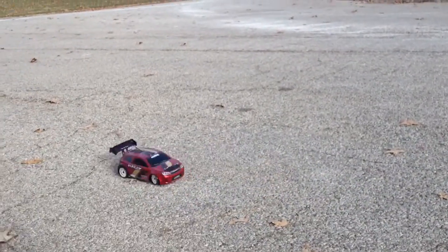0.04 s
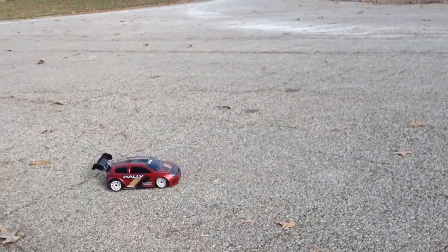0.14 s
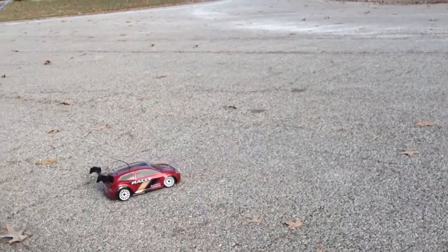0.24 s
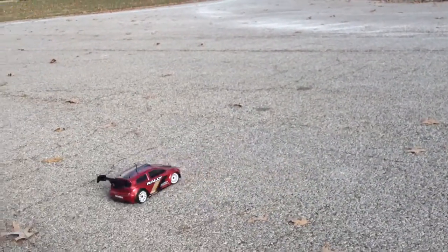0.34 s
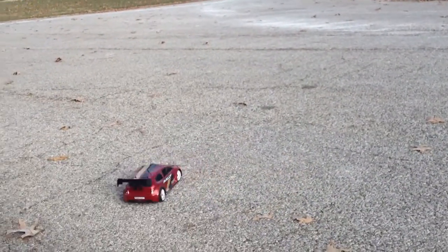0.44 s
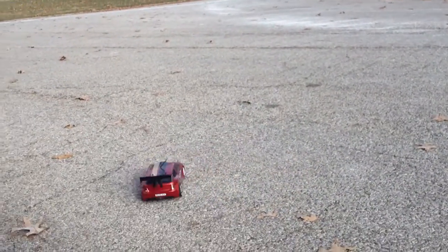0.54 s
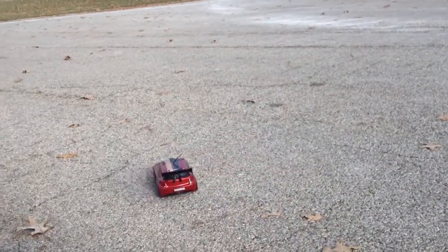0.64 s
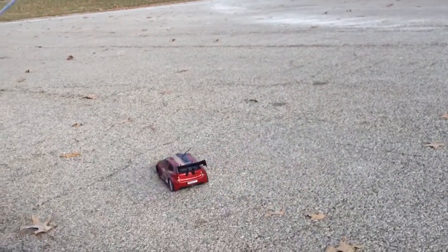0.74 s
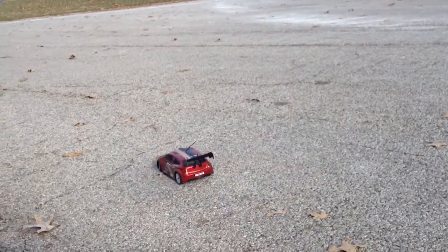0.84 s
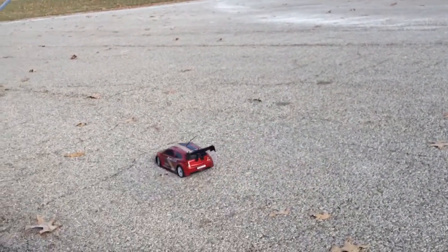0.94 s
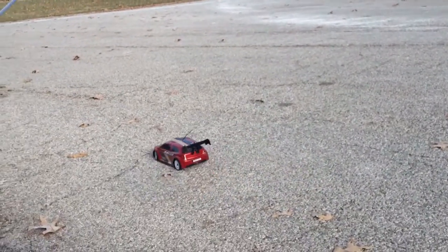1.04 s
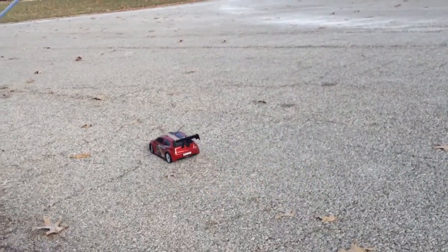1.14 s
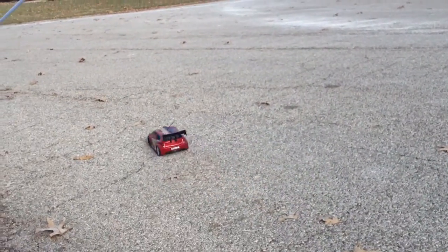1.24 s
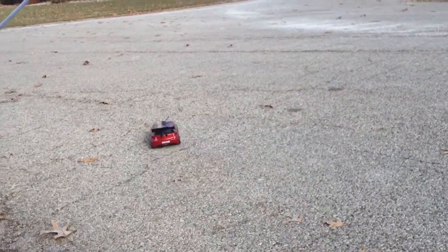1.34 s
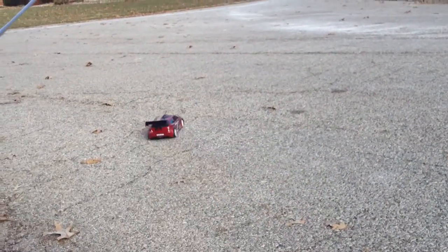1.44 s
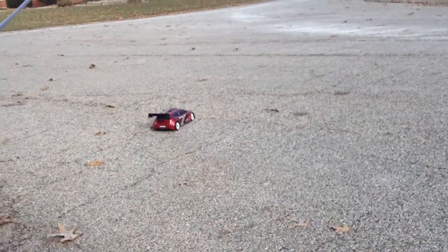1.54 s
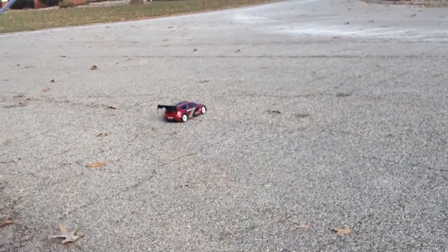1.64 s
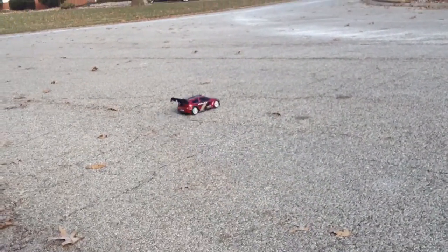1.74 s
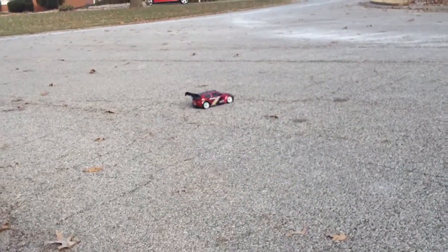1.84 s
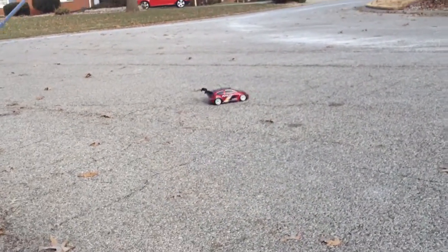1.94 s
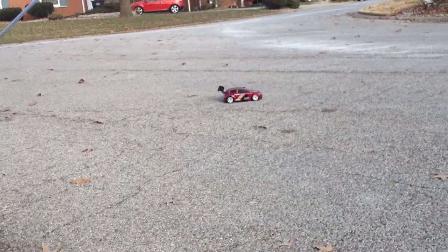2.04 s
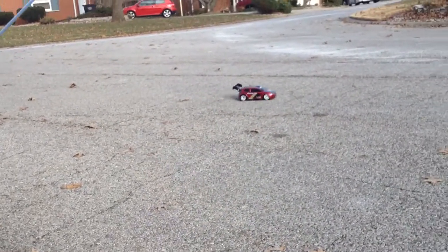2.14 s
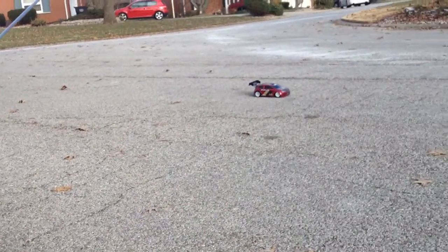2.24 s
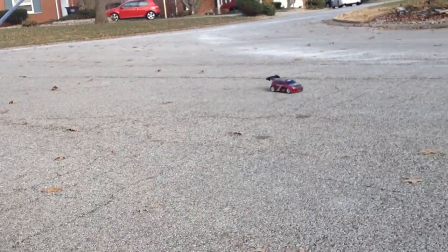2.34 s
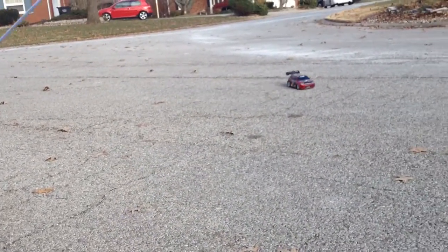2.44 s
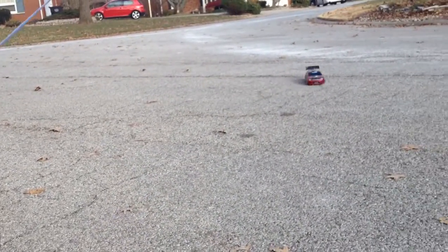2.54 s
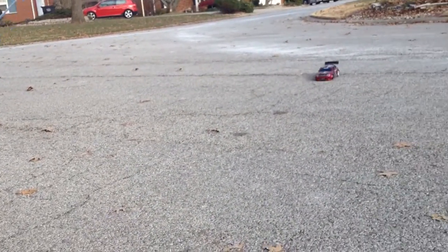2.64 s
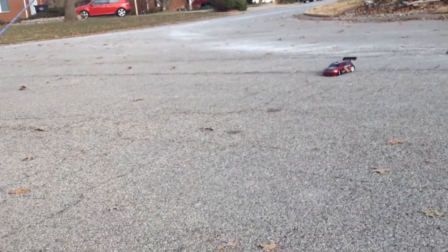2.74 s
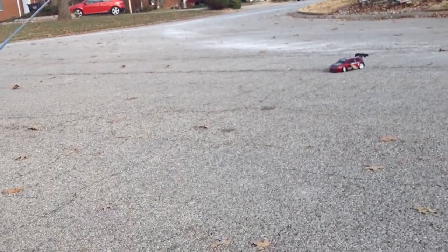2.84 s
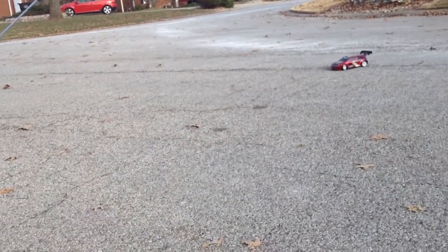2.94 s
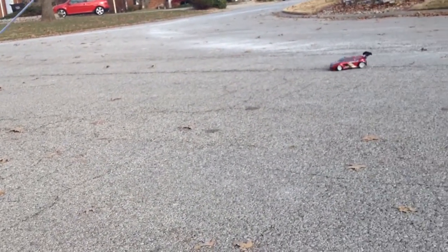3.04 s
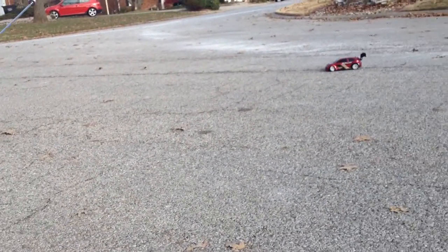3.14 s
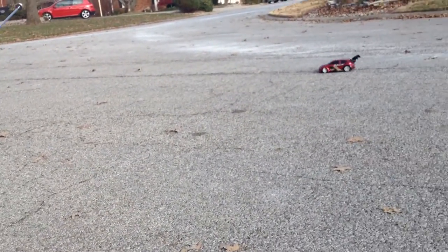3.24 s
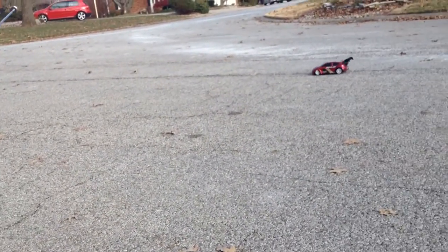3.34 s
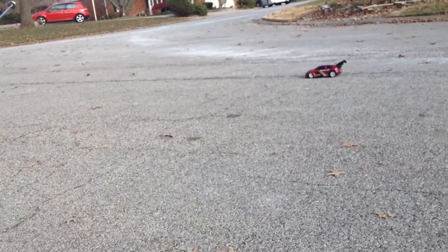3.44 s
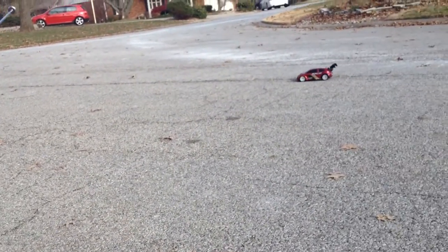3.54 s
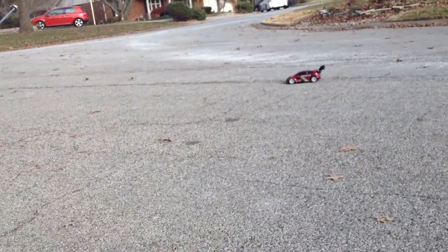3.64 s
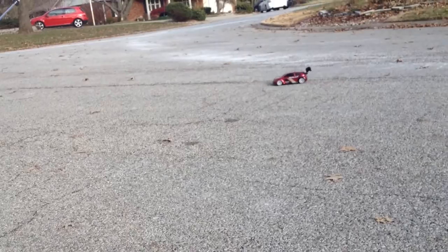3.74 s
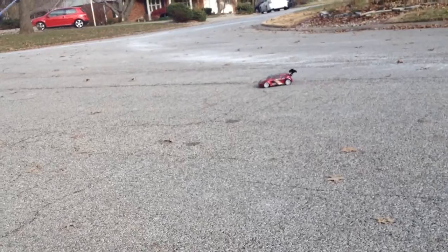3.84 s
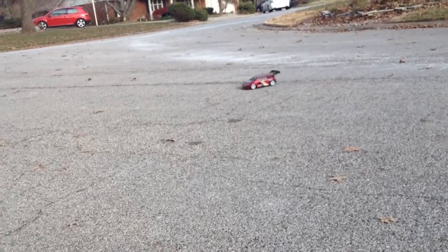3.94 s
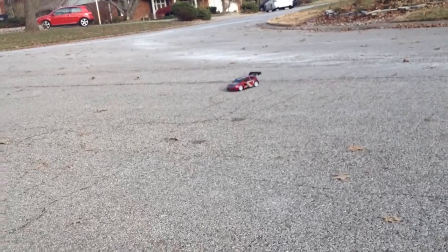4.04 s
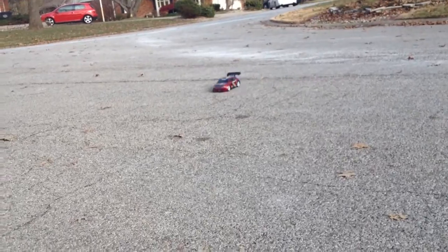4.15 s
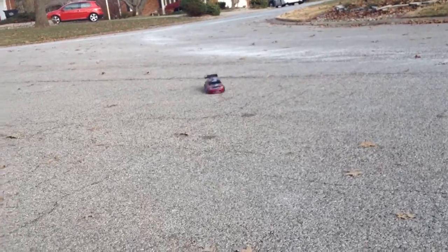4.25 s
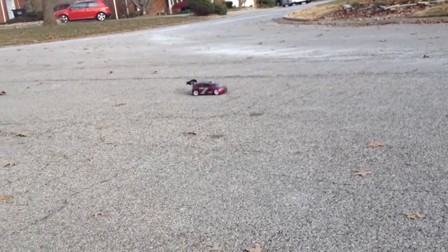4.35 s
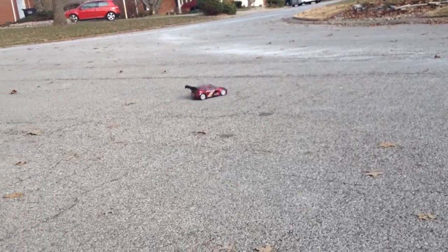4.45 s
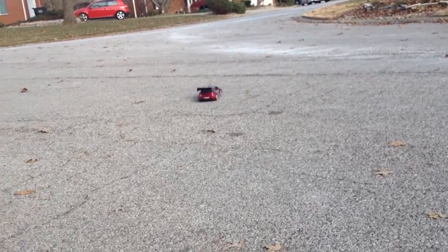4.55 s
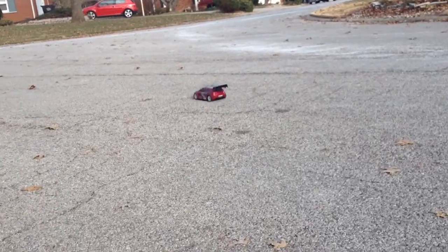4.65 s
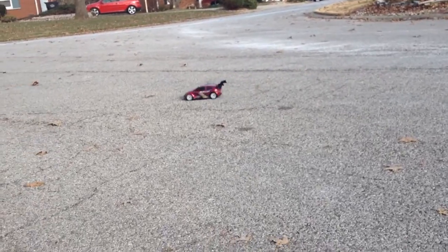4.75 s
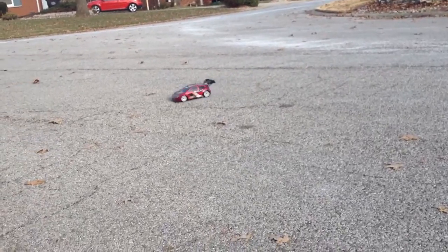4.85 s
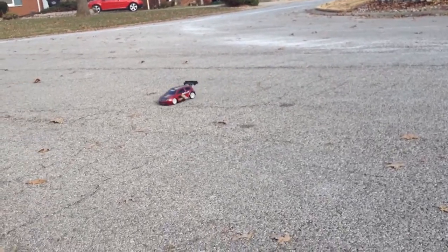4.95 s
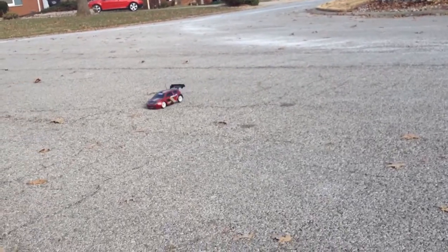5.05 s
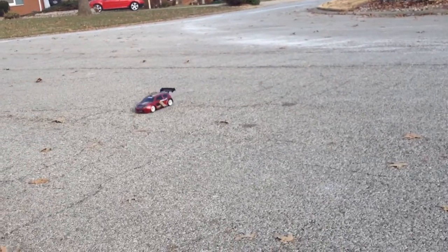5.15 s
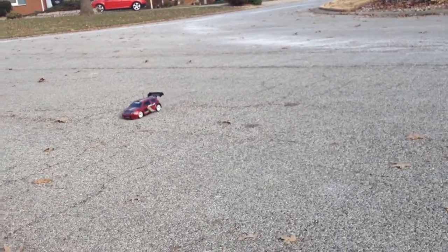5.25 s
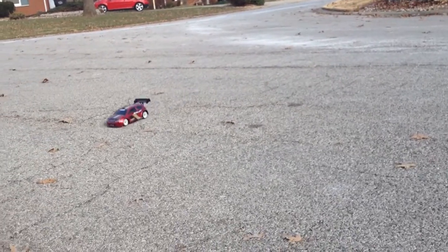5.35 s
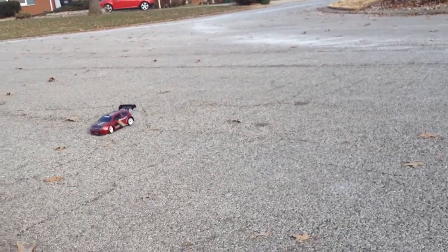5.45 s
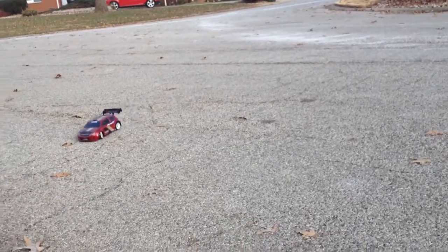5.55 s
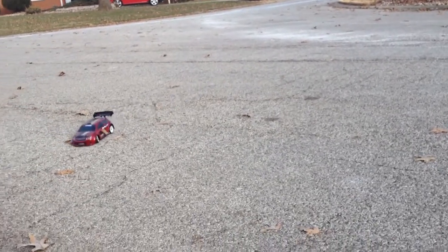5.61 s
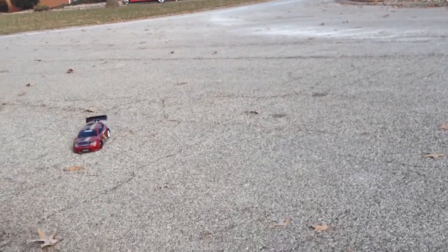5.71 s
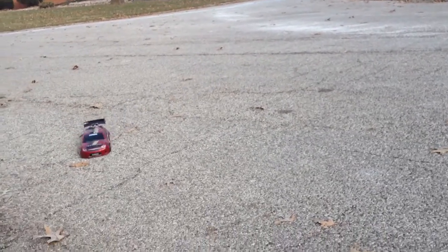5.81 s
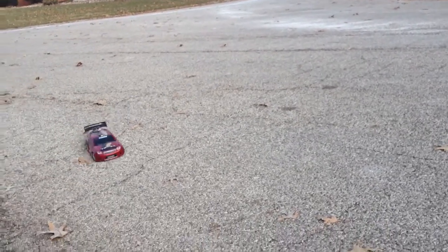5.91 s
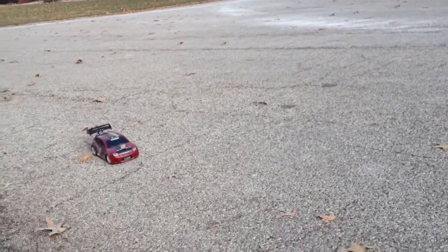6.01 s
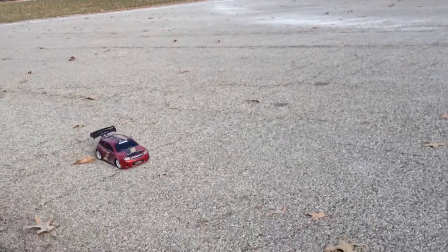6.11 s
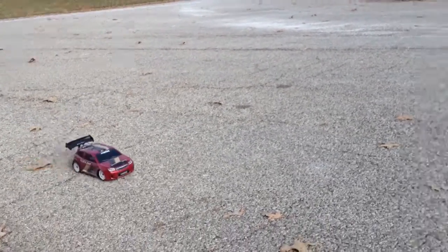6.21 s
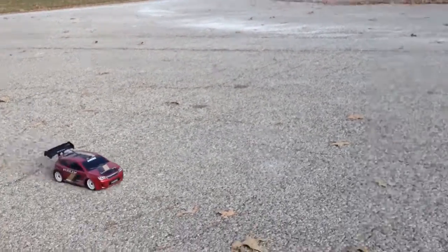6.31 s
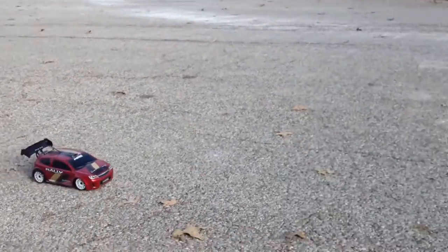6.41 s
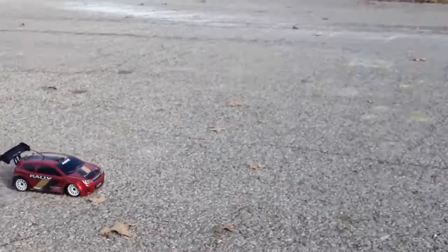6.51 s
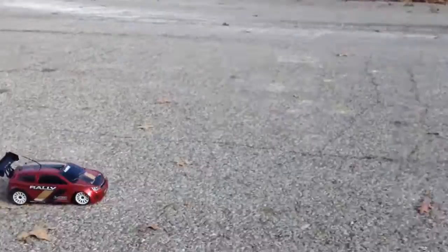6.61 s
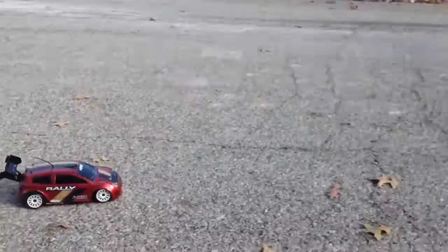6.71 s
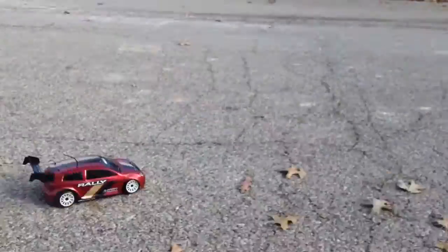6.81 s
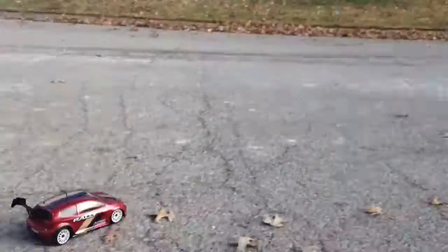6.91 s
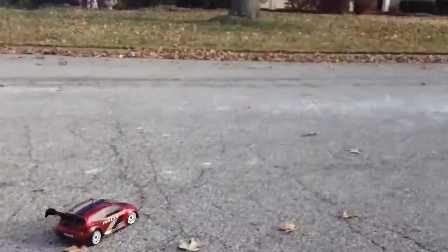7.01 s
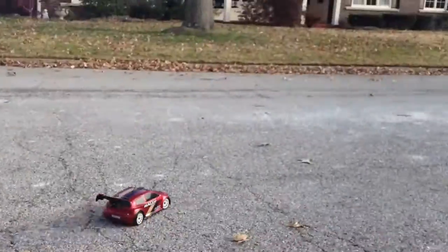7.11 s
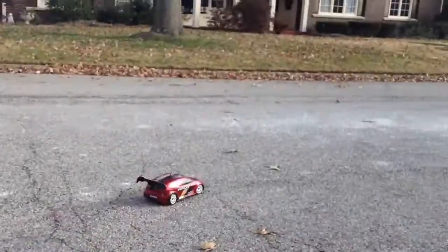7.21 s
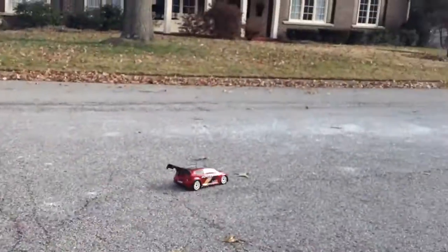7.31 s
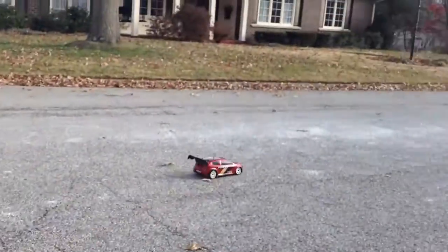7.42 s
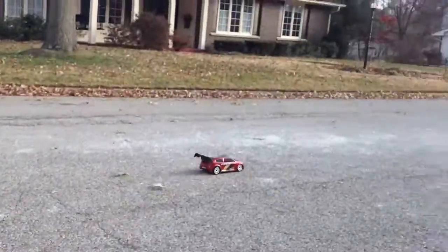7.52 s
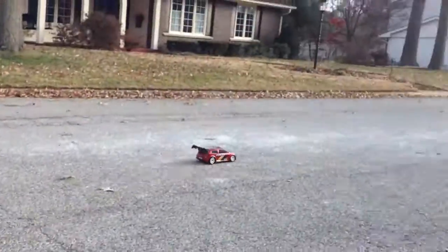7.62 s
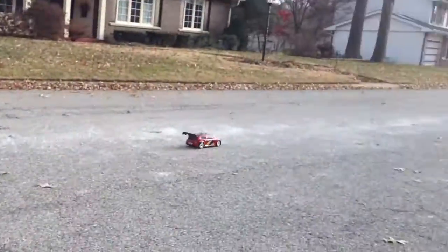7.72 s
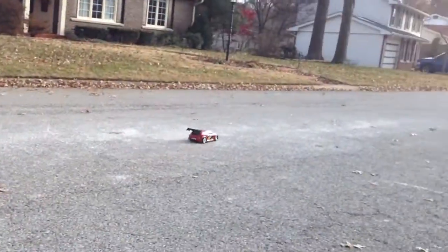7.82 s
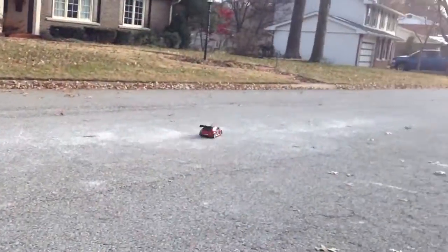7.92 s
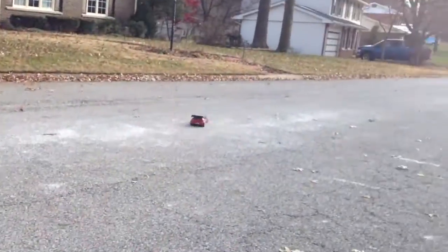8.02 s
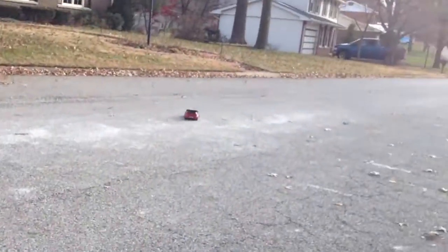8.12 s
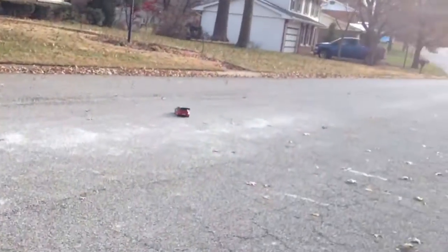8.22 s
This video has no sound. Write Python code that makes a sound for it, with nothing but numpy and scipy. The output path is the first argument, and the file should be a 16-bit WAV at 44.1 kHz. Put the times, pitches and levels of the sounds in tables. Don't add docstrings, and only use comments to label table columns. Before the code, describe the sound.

Raspy gear whine and plastic rattle of a remote-control car drifting on a road, with hissing grit, bright ticks and hollow knocks.

```python
import sys
import numpy as np
from scipy import signal
from scipy.fft import rfft, irfft
from scipy.io import wavfile
from scipy.ndimage import uniform_filter1d, map_coordinates

SR = 44100
rng = np.random.default_rng(int(sys.argv[2]) if len(sys.argv) > 2 else 0)


def generate_wav(sig):
    pcm = np.round(np.clip(np.atleast_2d(sig).T, -1, 1) * 32767).astype(np.int16)
    wavfile.write(sys.argv[1], SR, pcm)


def to_linear_factor(level_db):
    exponent = np.asarray(level_db, float) / 20
    return 10 ** exponent


N = 364704


def level(x, db):
    return x * to_linear_factor(db) / np.sqrt(np.mean(x ** 2))


def columns(table):
    s, *rest = np.transpose(table)
    return [np.interp(np.arange(N) / SR, s, column) for column in rest]


def band(x, hz, width):
    return signal.lfilter(*signal.iirpeak(hz, hz / width, fs=SR), x)


def walk(rate):
    hold = int(SR / rate)
    steps = np.repeat(rng.standard_normal(N // hold + 1), hold)
    return 1.28 * uniform_filter1d(uniform_filter1d(steps, hold), hold)[:N]


def body(x, modes, patchy_db=0, flip=-1):
    out = np.zeros(N)
    for k, (hz, width, db) in enumerate(modes):
        facing = to_linear_factor(db + patchy_db * walk(5))
        out += flip ** k * facing * band(x, hz, width)
    return out


def colour(x, points):
    hz, db = np.transpose(points)
    grid = np.log(np.arange(N // 2 + 1) * SR / N + 1)
    return irfft(rfft(x) * to_linear_factor(np.interp(grid, np.log(hz), db)), N)


def grains(spread_db, smear):
    height = np.minimum(rng.exponential(size=N), 5)
    hits = to_linear_factor(2 * spread_db * height) * (rng.random(N) < 0.05)
    power = signal.lfilter([1 - smear], [1, -smear], hits)
    return np.sqrt(power + 0.6 * power.mean()) * rng.standard_normal(N)


def ring(hz, decay_s, t):
    return np.sin(2 * np.pi * hz * t) * 1000.0 ** (-t / decay_s) * np.minimum(t / 0.0022, 1)


def add(out, s, sound):
    i = int(s * SR)
    out[i:i + len(sound)] += sound[:N - i]


# start in seconds, tooth rate aimed at in Hz, lag in seconds, level of the whine and of its
# lowest tone, both in dB above the rattle.
TRIGGER = [(0, 2000, 0.35, 5.5, -51), (.16, 2010, 0.3, -1, -3), (.3, 985, 0.55, 2, -1),
           (0.389, 994, 0.4, -9, -10), (.48, 978, 0.5, -2, -27), (.62, 992, 0.51, -6, -4),
           (1, 1000, 0.44, -3.5, -15), (1.42, 1487, 0.63, -6.5, -23), (1.58, 2400, 0.52, -9, -10),
           (1.74, 2401, 0.47, 0.5, -5), (1.95, 2396, 0.48, -5.5, -8), (2.35, 2390, 0.55, -3, -19),
           (2.83, 1870, .12, -0.5, -1.5), (3.15, 1984, 0.11, -9, 1), (3.38, 1404, 0.79, 1, 0.5),
           (3.6, 1399, 0.84, -8.5, -0.5), (3.921, 1945, 0.29, -4.5, 0.5), (4.129, 2004, .25, 0.5, -22),
           (4.28, 1606, 0.097, -1, -18), (4.34, 2610, 0.3, -5, -12), (4.53, 2400, 0.18, -9, -5.5),
           (4.66, 1003, 0.39, -3.5, -6), (4.86, 539, 0.079, -2, -3), (5, 540, 0.068, -10, -16),
           (5.06, 760.6, 0.63, -7, -23), (5.2, 1483, .5, -3, -22), (5.37, 1497, 0.51, -6, -18),
           (5.459, 560, 0.32, -5, -16), (6.06, 1492, 0.82, -9, -10), (6.17, 2380, 0.88, 1, -18),
           (6.27, 2400, .6, 0.5, -19), (6.39, 905.5, 0.063, -9, -18), (6.46, 2447, 0.39, -7, -18),
           (6.58, 2435, 0.38, -12, -3), (6.72, 2435, 0.4, -8.5, -5), (6.87, 2440, 0.38, -9.5, -12),
           (7.0, 2443, .41, -4, -11), (7.07, 2437, 0.43, -4.5, -8.5), (7.35, 2440, .41, -7, -13),
           (7.78, 3440, 1.27, -11, -6)]


def motor():
    t, hz, now = np.arange(N) / SR, np.zeros(N), TRIGGER[0][1]
    s, aim_hz, lag_s, whine_db, low_db = np.transpose(TRIGGER)
    for start, end, aim, lag in zip(s, [*s[1:], N / SR], aim_hz, np.abs(lag_s)):
        span = slice(int(start * SR), int(end * SR) + 1)
        hz[span] = aim + (now - aim) * np.exp((start - t[span]) / lag)
        now = aim + (now - aim) * np.exp((start - end) / lag)
    move = np.clip(np.searchsorted(s, t, side="right") - 1, 0, None)
    slew = int(0.04 * SR)
    curves = (hz, slew), (whine_db[move], 2 * slew), (low_db[move], 2 * slew)
    return [uniform_filter1d(curve, size, mode="nearest") for curve, size in curves]


# time in seconds, level in dB.
NEAR = [(0, -39), (1.45, -43), (2.2, -43.5), (2.4, -46), (3.5, -49), (4.25, -46), (4.56, -43), (4.9, -47),
        (5.04, -50.5), (5.25, -48.5), (5.46, -44.5), (5.55, -47.5), (5.9, -47), (6.36, -40), (6.43, -42),
        (6.77, -35.5), (7.3, -39.5), (8.27, -47.5)]


def nearness():
    return uniform_filter1d(columns(NEAR)[0], size=SR // 20)


# time in seconds, peak level in dB.
BITES = [(0.062, -28), (0.194, -33), (0.314, -37), (0.411, -27.5), (0.5052, -32), (0.7614, -29),
         (0.965, -29), (1.0457, -30), (1.0897, -32), (1.1548, -34), (1.2251, -43), (1.798, -36),
         (2.7995, -30), (2.824, -30), (2.9791, -38.5), (3.0073, -42), (3.0337, -40), (3.1313, -45.5),
         (3.1607, -36), (3.3094, -41), (3.3456, -40), (3.417, -40), (3.459, -42), (3.485, -40),
         (3.535, -37), (3.579, -37), (3.6232, -36), (3.6692, -35), (3.7, -36), (3.7287, -41),
         (3.7625, -37.5), (3.8289, -37), (4.0175, -40), (4.2981, -30), (4.3854, -31), (4.4858, -31),
         (4.5669, -29.5), (4.6005, -30.5), (4.9119, -35), (5.341, -38), (6.1968, -42), (6.2319, -38),
         (6.2984, -34), (6.3682, -32), (6.6173, -29), (6.6972, -27), (6.7244, -29), (6.774, -22),
         (6.807, -28), (6.8494, -27), (6.9314, -24), (6.9671, -26), (6.9972, -29), (7.0157, -24),
         (7.0476, -24), (7.1166, -28.5), (7.2902, -25.5), (7.3684, -27.5), (7.8375, -32), (7.957, -35)]


def spur_load(hz, near_db):
    spur_teeth = 58
    free = np.cumsum(hz / spur_teeth / SR)
    bite_s = np.array(BITES)[:, 0] + 0.003
    at = free[(bite_s * SR).astype(int)]
    whole = np.cumsum(np.maximum(np.round(np.diff(at, prepend=0)), 1)) + 0.5
    turn = np.interp(free, [0, *at, at[-1] + 50], [0, *whole, whole[-1] + 50])
    bite = (1 + 0.24 * rng.standard_normal(1000))[turn.astype(int)]
    load = -0.6 * bite * np.cos(2 * np.pi * turn) + 0.097 * walk(90)
    t = np.arange(1200) / SR
    bump = t / 0.0033 * np.exp(1 - t / 0.0033)
    for s, db in BITES:
        over_db = db - near_db[int(s * SR)] - 7
        add(load, max(s - 0.002, 0), 0.18 * max(over_db, 0) * bump)
    return np.minimum(load, 2.2)


CRUISE_HZ = 2000
# pitch in Hz, level in dB.
SINGS = [(1000, -17), (2300, -11), (3200, -6.5), (4200, -3.5), (5100, -7.5), (6500, -9.5), (8600, -12),
         (13000, -22)]
# time in seconds, level of the 2nd multiple in dB,
# level of the 6th and 8th multiples in dB, looseness of the teeth (backlash) from 0 to 1.
MESH = [(0, 11.5, -2, .3), (.14, 2, -2, 0.44), (.45, -4, 8, 1), (.53, 1, 2, 0.44), (.64, -1, 8, 1),
        (1.1, 2.5, 2, 0.65), (1.6, -1, 0, 0.52), (2.4, -2, -2, 1), (2.85, 2, 0, 0.85), (3.1, -6.5, 0, 0.96),
        (4.75, 0, -3.5, 0.95), (4.87, -7, -7, 0.82), (5.15, -1, 2, 0.56), (5.28, -1, 7, .5),
        (5.36, 4, -6, 0.7), (6.16, -8, 2, 0.53), (6.24, -9, -16, .5), (6.7, -0.5, 5, 0.92)]
MULTIPLE_DB = (-1.5, -15, -2, -4.5, -8)
POWER_DB = (1.8, 2, 4.2, 3.7, 1.1)


def gear_levels(hz, near_db, whine_db, low_db):
    second_db, high_db, backlash = columns(MESH)
    grid, carried_db = np.transpose(SINGS)
    power = uniform_filter1d(1.0 * (np.gradient(hz) > 0), size=SR // 20)
    half_db = near_db - 29 + 22 * np.log2(hz / CRUISE_HZ)
    levels_db = [half_db, near_db + low_db]
    mesh = (second_db, 0, 0, high_db, high_db)
    for k, db, gain_db, mesh_db in zip((2, 3, 4, 6, 8), MULTIPLE_DB, POWER_DB, mesh):
        shell_db = np.interp(np.log(k * hz), np.log(grid), carried_db)
        levels_db.append(near_db + whine_db + db + mesh_db + power * gain_db + shell_db)
    return levels_db, backlash


SMEAR_HZ = (70, 430, 330, 500, 520, 550, 650)
STEADY = (.5, .6, .36, .2, .3, .3, .3)
BITE_DB = (4.4, 7, 6, 6, 6.5, 5.5, 5.5)
PATCHY_DB = (1, 1, 1.5, 3, 2.5, 2.5, 3)
# pitch in Hz, width in Hz, level in dB.
SHELL = [(1940, 1090, -3.5), (2400, 700, -2), (3020, 320, -21), (3690, 750, -1.5), (4500, 150, 1.5),
         (5100, 290, -26)]
# pitch in Hz, width in Hz, level in dB below the rattle.
TRAY = (1705, 16, -19)


def whine(hz, levels_db, load, backlash):
    phase = 2 * np.pi * np.cumsum(hz * (1 + 0.0065 * walk(60))) / SR
    lines = []
    settings = zip((0.5, 1, 2, 3, 4, 6, 8), levels_db, SMEAR_HZ, STEADY, BITE_DB, PATCHY_DB)
    for k, db, smear, clean, bite_db, patchy_db in settings:
        steady = np.sin(k * phase)
        rough = walk(smear) * steady + walk(smear) * np.cos(k * phase)
        tone = clean * steady + np.clip(backlash, 0.2, 1) * rough
        throb = to_linear_factor(bite_db * load + 1.54 * walk(35) + patchy_db * walk(11))
        in_range = k * hz < 0.35 * SR
        lines.append(to_linear_factor(db) * level(throb * tone, 0) * in_range)
    half, first, upper = lines[0], lines[1], sum(lines[2:])
    cover = to_linear_factor(-4.5) * band(first, 1884, 200) + to_linear_factor(-7.5) * band(first, 2156, 190)
    first = to_linear_factor(-33) * first + cover + to_linear_factor(-10) * band(first, *TRAY[:2])
    through_shell = to_linear_factor(-6.5) * body(upper, SHELL, patchy_db=2.0, flip=0.99)
    past_shell = to_linear_factor(-3.5) * upper
    muffle = signal.butter(2, 15000, fs=SR, output="sos")
    return signal.sosfilt(muffle, half + first + through_shell + past_shell)


# pitch in Hz, density in dB per Hz.
GRIT = [(710, -19.5), (1200, -4), (1760, -6.5), (2890, -2), (4110, 2), (4930, -3), (9000, -6.5),
        (13500, -14), (15500, -11)]
# pitch in Hz, width in Hz, level in dB.
TUB = [(468, 250, -5), (599, 98, 4), (824, 108, -4.5), (1157, 172, -1)]
# middle in seconds, length in seconds, gain in dB.
COARSE = [
    (1.85, 0.17, 4.5),
    (4.759, .12, 1),
    (6.68, 0.19, 3.5),
    (7.306, 0.1, 0.5),
    (7.6, .35, 3.5),
]


def rolling(load, hz, near_db):
    speed, closer_db = np.log2(hz / CRUISE_HZ), near_db - near_db.mean()
    grit_db = near_db - 3 + 3.5 * speed + 0.081 * closer_db
    tub_db = near_db - 10 + 0.31 * speed + 0.06 * closer_db
    thud_db = near_db - 18.5 - 2 * speed - 0.26 * closer_db
    t = np.arange(N) / SR
    coarse_db = sum(db * np.exp(-(2 * (t - s) / length) ** 2) for s, length, db in COARSE)
    tub_db, thud_db = tub_db + coarse_db, thud_db + 0.56 * coarse_db

    teeth = to_linear_factor(0.54 * load) * grains(2.0, 0.9)
    rattle = level(body(teeth, SHELL, patchy_db=3.0), -9.5) + level(band(teeth, *TRAY[:2]), TRAY[2])
    side, tail = panels()
    rattle = rattle + side * level(band(teeth, 3470, 130), 0) + tail * level(band(teeth, 3950, 130), 0)
    shake = walk(30)
    grit = colour(to_linear_factor(1.66 * load + 0.87 * shake + walk(40)) * grains(2.17, 0.95), GRIT)
    tub = body(to_linear_factor(2.33 * shake + 0.73 * walk(10)) * grains(4.1, 0.99), TUB, patchy_db=1.34)
    thud = band(band(to_linear_factor(walk(8.5)) * rng.standard_normal(N), 259, 330), 259, 330)

    jolt = jolts()
    shaken_shell, shaken_tub = jolt * to_linear_factor(-10), jolt * to_linear_factor(-7.5)
    return ((to_linear_factor(near_db) + shaken_shell) * rattle
            + (to_linear_factor(grit_db) + shaken_shell * to_linear_factor(-11)) * level(grit, 0.17)
            + (to_linear_factor(tub_db) + shaken_tub) * level(tub, -2.6)
            + (to_linear_factor(thud_db) + shaken_tub * to_linear_factor(-12)) * level(thud, -1.6))


# middle in seconds, length in seconds, level in dB above the rattle.
SIDE_FACING = [
    (2.6, 0.49, -8.5),
    (5.4, 0.26, -14),
    (5.65, 0.38, -12.5),
    (6.1, .4, -13.5),
]
# middle in seconds, length in seconds, level in dB.
TAIL_FACING = [
    (.62, 0.44, -6.5),
    (1.551, 0.48, -8.5),
    (2.98, .15, -9),
    (5.4, 0.3, -11),
    (6.15, 0.44, -8),
    (8.06, .25, -16),
]


def panels():
    t = np.arange(N) / SR
    swells = []
    for moments in (SIDE_FACING, TAIL_FACING):
        swing = sum(to_linear_factor(db) * np.exp(-(2 * (t - s) / length) ** 2) for s, length, db in moments)
        swells.append(to_linear_factor(-19) + swing)
    return swells


# time in seconds, peak level in dB, ring pitch in Hz,
# crack level in dB above the ring, decay in seconds.
KNOCKS = [(2.013, -37, 987, 15, 0.051), (2.819, -34.5, 340, 11.5, 0.032), (3.96, -43, 396, -12, 0.054),
          (4.2, -42.5, 374.4, -14, 0.058), (4.307, -26, 524, -12, 0.02), (4.772, -34.5, 789, 12, 0.034),
          (5.024, -46.5, 282, -3, 0.087), (5.154, -42.5, 584, 10, 0.036), (5.464, -44, 725, -2, 0.042),
          (5.505, -42, 371, -5, 0.038), (5.603, -40.5, 279, 13, 0.044), (5.912, -39.5, 1486, 1, 0.031),
          (6.279, -51, 719, 2, 0.035), (6.303, -36, 576, 2, 0.024), (6.368, -26.5, 1253, 21.5, 0.033),
          (6.469, -37, 367, -5, 0.066), (6.59, -37.5, 300.5, -14, 0.048), (7.283, -35, 1315, 1, 0.054),
          (7.31, -31.5, 473, 7, 0.079), (7.929, -39, 322, 2, 0.032), (7.94, -53, 660, 28, 0.019),
          (7.956, -22.5, 955, 10.5, 0.039), (7.989, -66, 1242, -5, 0.047), (8.057, -35.5, 590, -10, 0.039)]
# time in seconds, peak level in dB, centre pitch in
# Hz.
TICKS = [(0.389, -33, 7430), (0.4135, -30, 5290), (0.6794, -38, 8260), (1.7474, -34, 6150),
         (2.223, -44, 5310), (2.253, -33, 8480), (2.388, -31, 8590), (2.4123, -39, 8720),
         (2.8034, -42, 8870), (2.825, -42, 8890), (2.9088, -31, 8570), (2.9387, -30, 8140),
         (2.9781, -42, 7960), (3.2182, -30, 7380), (3.3107, -44, 8140), (3.3476, -32.5, 7740),
         (3.519, -32, 7800), (3.5798, -38, 8030), (3.668, -37, 8015), (4.0679, -37, 7160),
         (4.391, -25, 7570), (4.511, -42, 8460), (4.5679, -35, 6870), (4.5977, -32, 7050),
         (4.7029, -27, 8620), (4.7531, -39, 7660), (5.9653, -42, 7610), (6.1978, -38, 4980),
         (6.3395, -30, 7430), (6.3682, -29, 13600), (6.4892, -39, 6464), (6.8799, -32, 7500),
         (6.9313, -30, 8410), (6.9691, -26, 8060), (6.991, -35, 5280), (7.0492, -27, 8490),
         (7.2384, -32, 9010), (7.2669, -29, 8670), (7.2893, -27.5, 6810), (7.416, -30.5, 6980),
         (7.454, -30, 9230), (7.7835, -36, 6410), (7.94, -35, 7180), (7.954, -33, 5100),
         (7.9962, -30, 5390)]


def stones(tooth_hz):
    out, t = np.zeros(N), np.arange(4000) / SR
    for s, db, hz, crack_db, decay_s in KNOCKS:
        hollow = (ring(hz, decay_s, t) + 0.5 * ring(1.7 * hz, 0.77 * decay_s, t)
                  + ring(1.91 * hz, 0.29 * decay_s, t))
        noise = rng.standard_normal(len(t))
        crack = band(noise, 2950, 2900) * 1000.0 ** (-t / 0.018) * np.minimum(t / 0.001, 1)
        add(out, s, to_linear_factor(db) * (hollow + to_linear_factor(crack_db - 6) * crack))
    for s, db, hz in TICKS:
        chirp = abs(hz / tooth_hz[int(s * SR)] - 4) < 0.4
        width_hz = 650 if chirp else 2200
        bright = band(band(rng.standard_normal(len(t)), hz, width_hz), hz, width_hz)
        fade = 1000.0 ** (-t / 0.048) * np.minimum(t / 0.0029, 1)
        add(out, s - 0.002, to_linear_factor(db + 5) * bright * fade)
    return signal.sosfilt(signal.butter(2, 220, "high", fs=SR, output="sos"), out)


def jolts():
    out, t = np.zeros(N), np.arange(6000) / SR
    for s, db, *_ in KNOCKS:
        add(out, s - 0.004, to_linear_factor(db) * np.exp(-t / 0.018) * np.minimum(t / 0.0077, 1))
    return out


# time in seconds, lag in milliseconds, strength from 0 to 1.
BOUNCE = [(0, 1.13, 0.45), (.6, 1.25, 0.5), (1.6, 1.235, 0.36), (3.1, 1.215, 0.3), (3.9, 1.33, 0.24),
          (4.5, 1.19, 0.33), (5.1, 1.27, 0.39), (6, 1.17, 0.53), (6.65, 1.19, 0.19), (6.85, 1.26, 0.23)]


def arrivals(car):
    lag_ms, strength = columns(BOUNCE)
    late = map_coordinates(car, [np.arange(N) - (lag_ms + 0.006 * walk(4)) * SR / 1000], order=3)
    late = signal.lfilter([0.78], [1, -0.22], late)
    strength = np.clip(strength + 0.1 * walk(5), 0, 0.9)
    mirror_ms = 0.542 + 0.1 * walk(1.443)
    car = car + 0.19 * map_coordinates(car, [np.arange(N) - mirror_ms * SR / 1000], order=1)
    return (car + strength * late) / np.sqrt(1 + strength ** 2)


# pitch in Hz, density in dB per Hz.
SUBURB = [(15, -65), (25, -11), (193, 7.5), (293, 4), (385, -19), (585, 1.5), (1250, -0.5), (1690, 4),
          (2000, -1), (2900, 2.5), (3800, -12), (5240, -11), (9000, -7), (11700, -73), (19800, -120)]
# pitch in Hz, width in Hz, level in dB, time it leaves in seconds.
IDLER = (107, 16, -72.5, 1.7)


def suburb():
    swell = to_linear_factor(1.2 * walk(3))
    hz, width, db, leaves_s = IDLER
    leaving = 1 + (np.arange(N) / SR / leaves_s) ** 3
    idler = level(band(rng.standard_normal(N), hz, width), db) / leaving
    return level(swell * colour(rng.standard_normal(N), SUBURB), -60) + idler


def scene():
    hz, whine_db, low_db = motor()
    near_db = nearness()
    load = spur_load(hz, near_db)
    levels_db, backlash = gear_levels(hz, near_db, whine_db, low_db)
    gears = whine(hz, levels_db, load, backlash)
    car = to_linear_factor(4) * gears + rolling(load, hz, near_db) + stones(hz)
    return (arrivals(car) + suburb())[None]


def low_pass(x):
    return signal.sosfilt(signal.butter(12, 15460, fs=SR, output="sos"), x)


def record(dry):
    bass_cut = signal.sosfilt(signal.butter(4, 95, "high", fs=SR, output="sos"), dry)
    top_cut = signal.sosfilt(signal.ellip(10, 0.2, 80, 15430, fs=SR, output="sos"), bass_cut)
    return low_pass(top_cut)


dry = scene()
out = record(dry)
generate_wav(out)
```